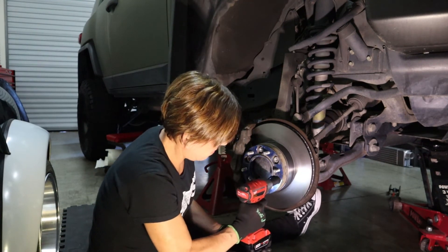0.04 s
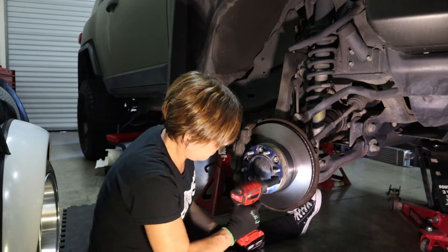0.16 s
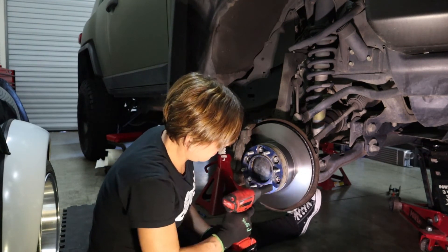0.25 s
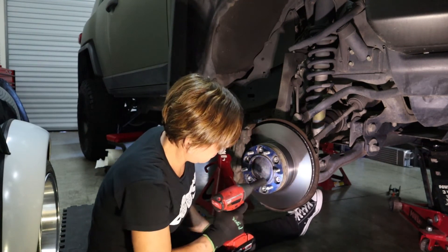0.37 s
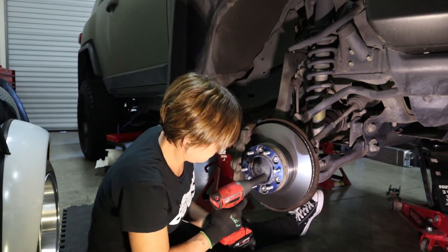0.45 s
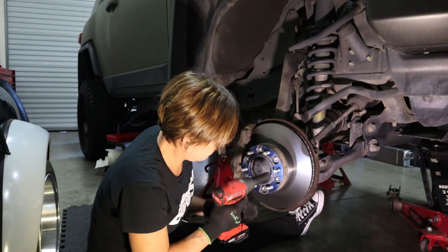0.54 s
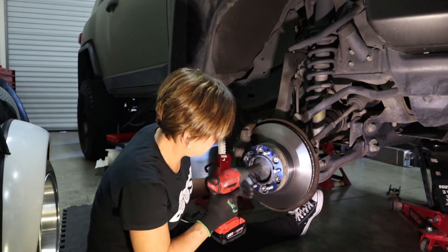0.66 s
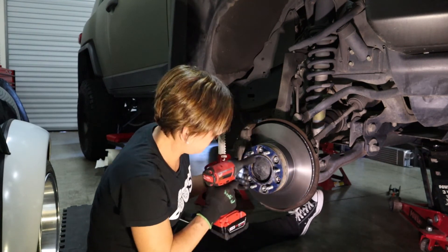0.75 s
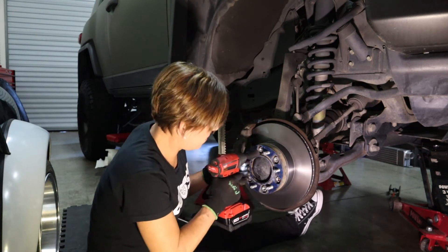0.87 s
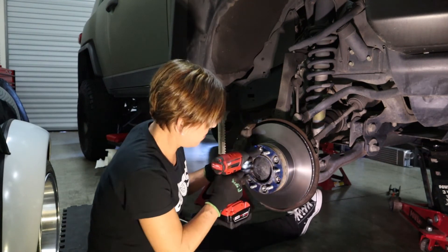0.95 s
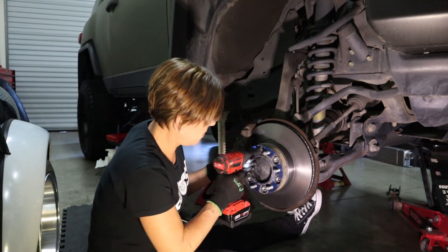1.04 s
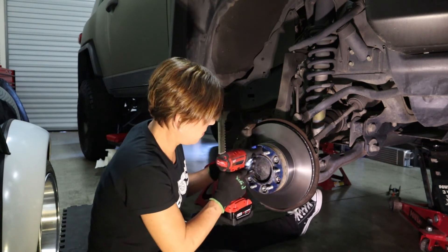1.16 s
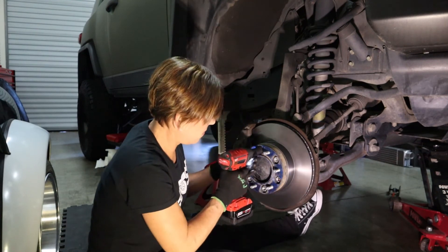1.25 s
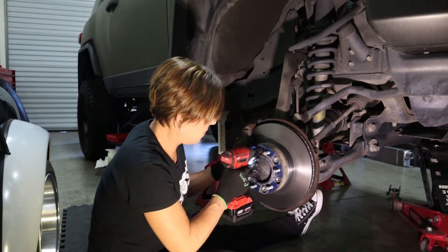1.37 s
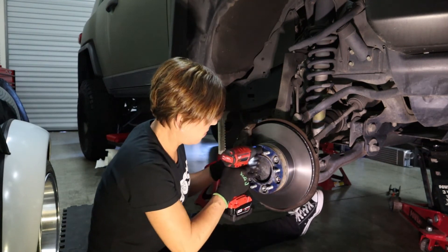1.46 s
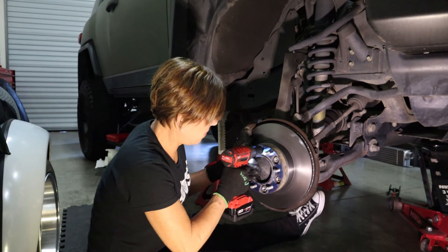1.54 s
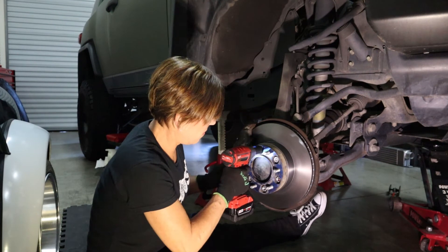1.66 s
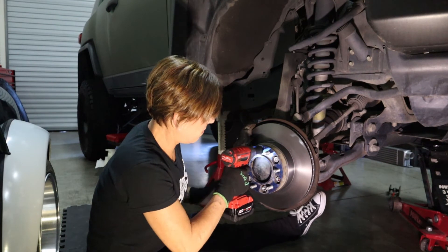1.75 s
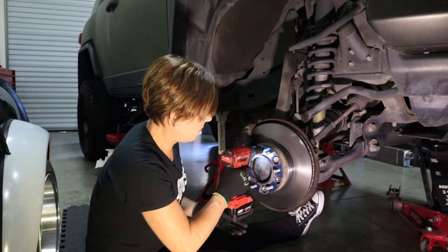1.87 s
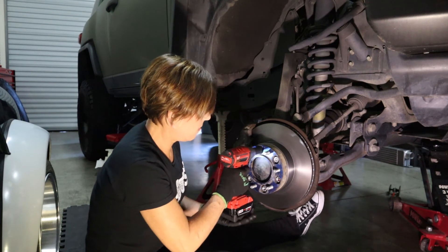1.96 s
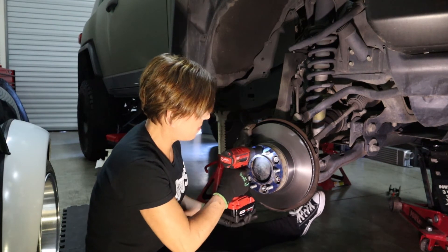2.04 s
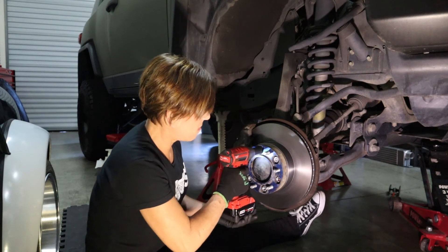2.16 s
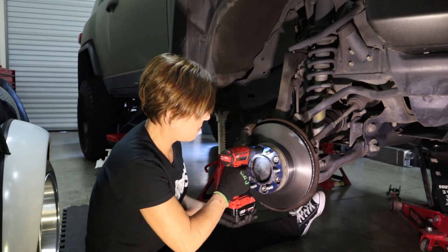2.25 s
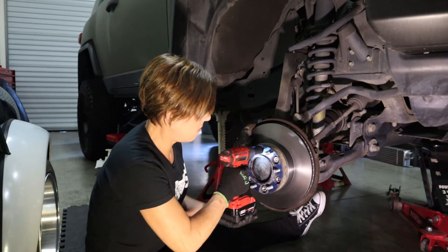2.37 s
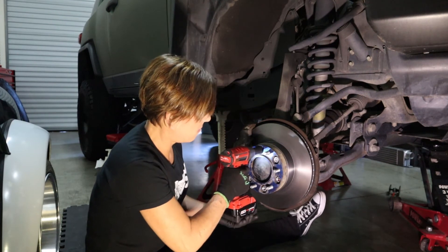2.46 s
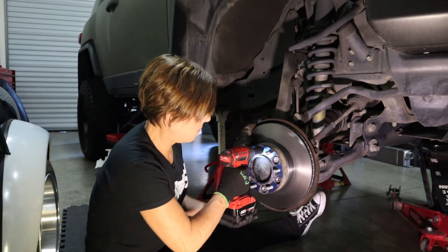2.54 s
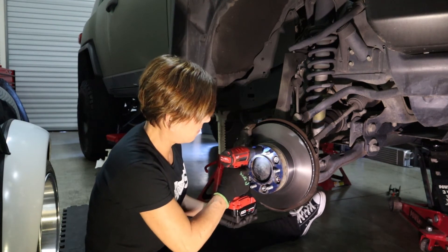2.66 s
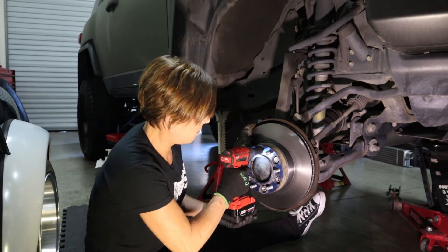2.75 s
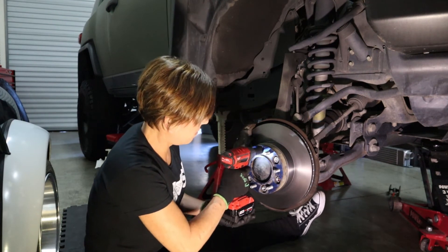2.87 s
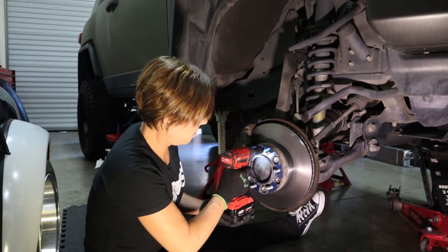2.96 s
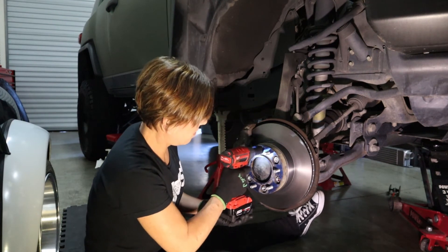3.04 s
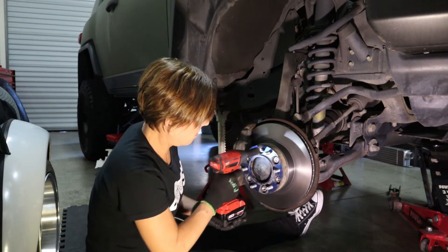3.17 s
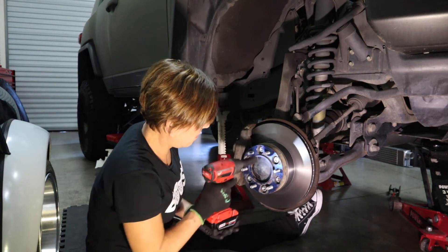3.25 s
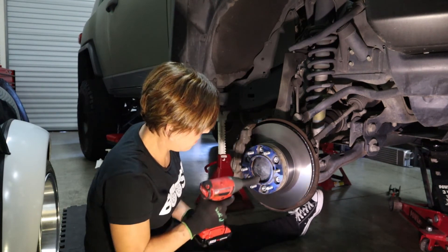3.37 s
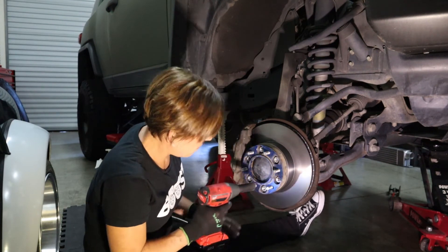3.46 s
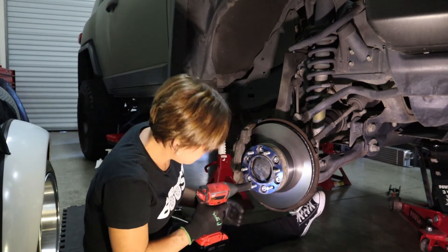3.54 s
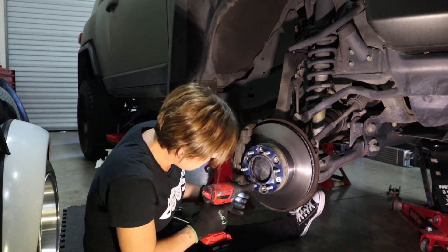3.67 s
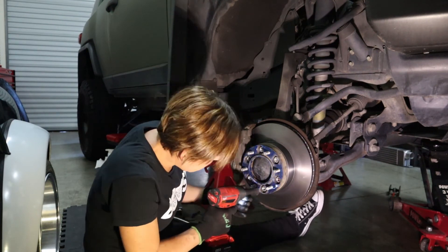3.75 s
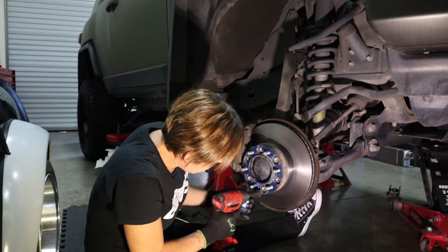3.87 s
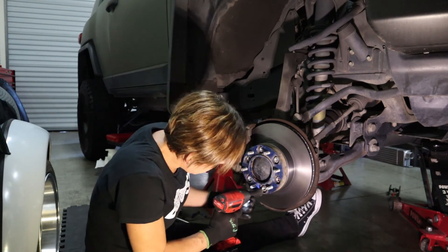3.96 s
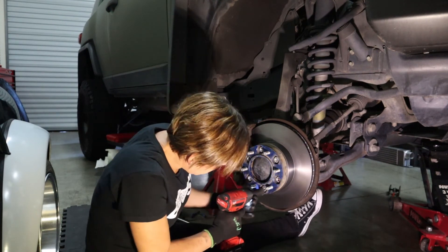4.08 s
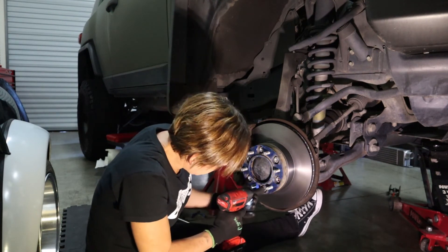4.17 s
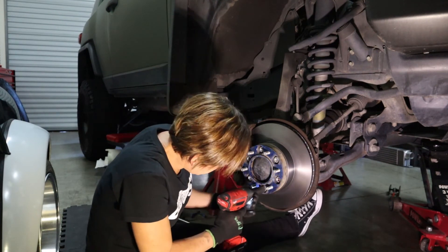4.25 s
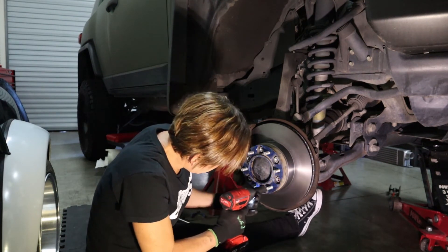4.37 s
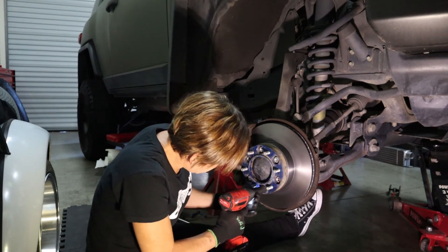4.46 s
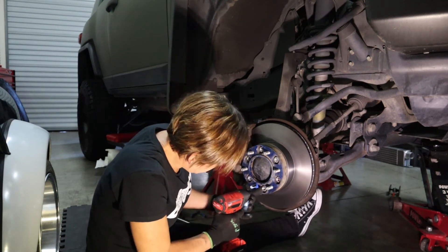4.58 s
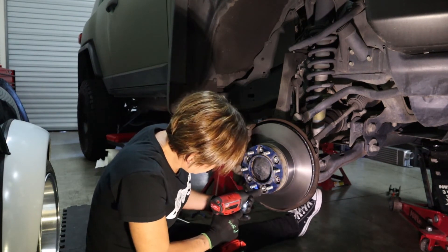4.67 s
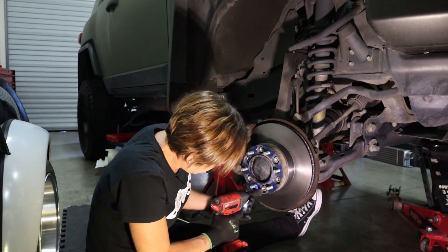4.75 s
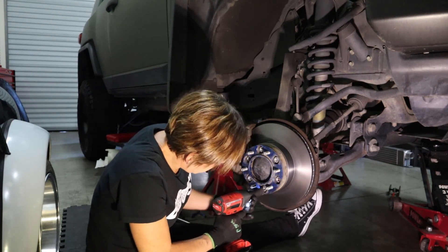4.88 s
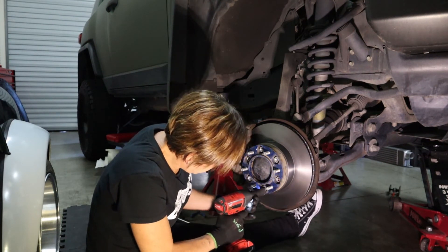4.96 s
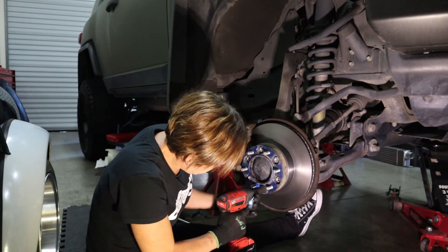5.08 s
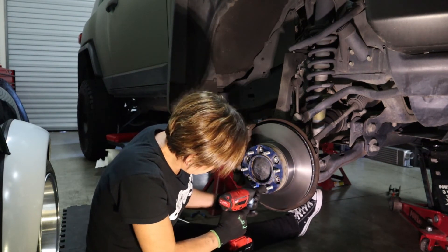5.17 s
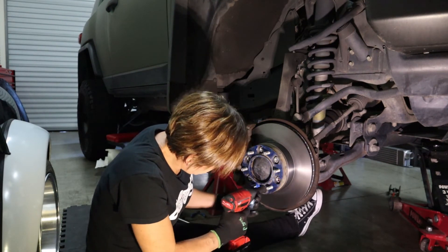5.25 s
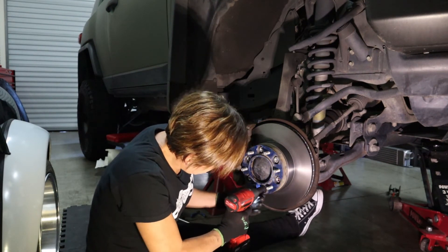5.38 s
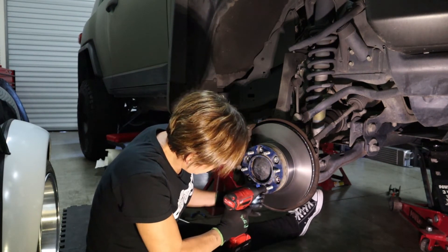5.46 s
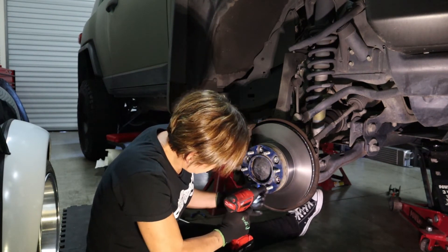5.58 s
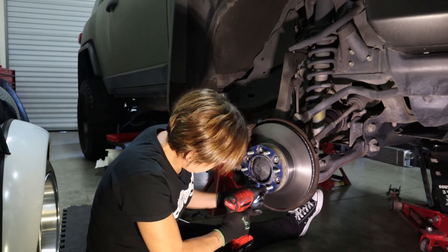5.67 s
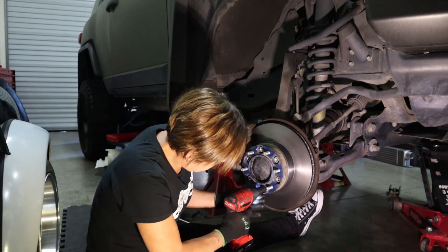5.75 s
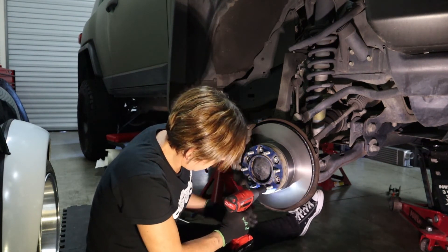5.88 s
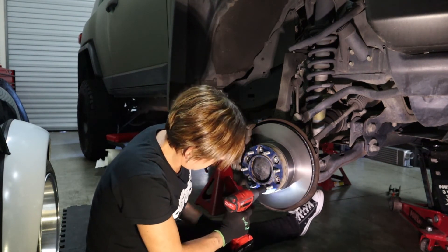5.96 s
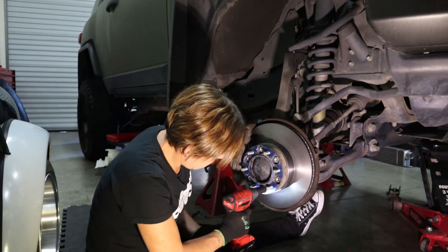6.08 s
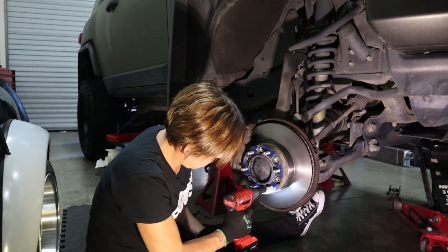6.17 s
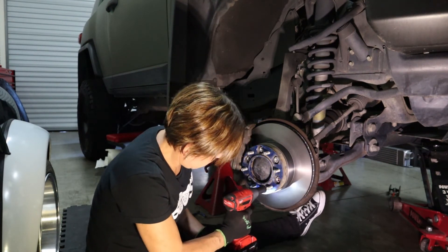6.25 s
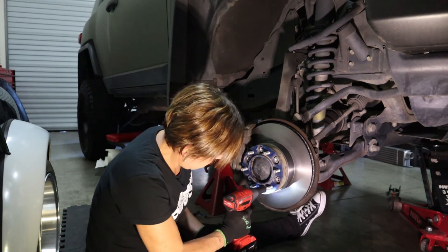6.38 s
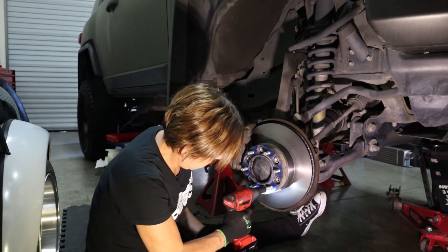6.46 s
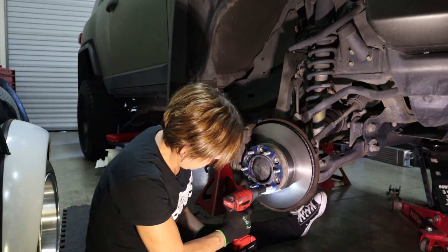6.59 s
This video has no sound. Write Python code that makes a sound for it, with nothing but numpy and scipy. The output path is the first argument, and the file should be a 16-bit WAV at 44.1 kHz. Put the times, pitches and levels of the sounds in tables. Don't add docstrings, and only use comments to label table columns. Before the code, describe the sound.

A garage with low rumble, faint mains hum and hiss, heard by a close small stereo microphone. At 0.2-0.4 s a socket ticks and lightly scrapes on a steel wheel hub with a thin high ring; duller knocks come at 1.1 and 1.2 s, then a loud bright clang on the hub cap at 1.5 s, ringing on over a scrape. After small ticks near 2.05 s, a cordless impact wrench spins up at 2.1 s with a brief thin whistle, rattles unevenly, then hammers about fifty-four blows a second until 2.9 s, thumping the microphone. Metal rings out and the room drops very quiet, slowly swelling back. Tiny dry snaps come at 3.5-3.8 s, faint clinks at 4.2-4.6 s, a knock at 5.05 s, taps, and a sharp clack at 5.45 s. From 6.1 s a second burst, loose then steady, hammers to about 6.6 s, as the sound ends.

```python
import sys
import numpy as np
from scipy import signal
from scipy.fft import rfft, irfft, next_fast_len
from scipy.io import wavfile
from scipy.ndimage import uniform_filter1d

SR = 44100
rng = np.random.default_rng(int(sys.argv[2]) if len(sys.argv) > 2 else 0)


def ratio(d):
    e = np.asarray(d, float) / 20
    return 10 ** e


def inscribe(sig):
    pcm = np.round(np.clip(np.atleast_2d(sig).T, -1, 1) * 32767)
    wavfile.write(sys.argv[1], SR, pcm.astype(np.int16))


N = 291942


def evened(x):
    return x / np.sqrt(np.mean(x ** 2) + 1e-20)


def read(points, hz):
    point_hz, value = np.transpose(points)
    return np.interp(np.log(hz + 1), np.log(point_hz + 1), value)


def level(curves):
    t, out = np.arange(N) / SR, np.zeros(N)
    for curve in curves:
        curve_s, curve_db = np.transpose(curve)
        out += ratio(np.interp(t, curve_s, curve_db, -200, -200))
    return uniform_filter1d(out, size=200)


def strokes(rows):
    edge_db = -14.5
    return level([[(start_s, db + edge_db), (peak_s, db), (end_s, db + edge_db)]
                  for start_s, peak_s, end_s, db in rows])


def grit(per_s, spread_db):
    size = ratio(spread_db * np.minimum(rng.exponential(1, N), 4))
    return evened(size * (rng.random(N) < per_s / SR))


# pitch_hz, likeness (0-1)
CHANNEL_LIKENESS = [(30, 0.97), (120, 1), (400, 0.58), (1000, 0.18), (4000, 0.033)]


def noise(spectrum, alike):
    hz = np.fft.rfftfreq(N, 1 / SR)
    a, b = rfft(rng.standard_normal((2, N)))
    same = np.clip(alike * read(CHANNEL_LIKENESS, hz), 0, 1)
    pair = np.array([a, same * a + np.sqrt(1 - same ** 2) * b])
    return evened(irfft(pair * ratio(read(spectrum, hz)), N))


def colour(row, hz, top_db):
    _, peak_db, disc_db, flange_db, tick_db = row[:5]
    points = [(1200, -9.0), (1880, -8.5), (1975, disc_db), (2150, -6), (2700, -9.0), (3800, flange_db),
              (4600, flange_db - 3), (8000, tick_db), (11500, tick_db), (12750, top_db)]
    return peak_db + read(points, hz)


def rings(modes, strikes, rub, scatter_db):
    out, shake = np.zeros((2, N)), rng.standard_normal((2, N)) + 0j
    for hz, db, t60_s in modes:
        drive = rub * (hz < 5500) * np.roll(shake, rng.integers(N), 1)
        quarter = np.array([1, rng.choice([1j, -1j])])
        for row, top_db in strikes:
            luck = rng.standard_normal(2)
            kick = ratio(colour(row, hz, top_db) + scatter_db * luck[0]) * np.exp(2j * luck[1])
            drive[:, round(row[0] * SR)] += kick * quarter
        for split_hz, share in ((0, 1), (min(.006 * hz, 22), .55)):
            pole = np.exp(2j * np.pi * (hz + split_hz) / SR - np.log(1000) / (t60_s * SR))
            out += share * ratio(db) * signal.lfilter([1], [1, -pole], drive).imag
    return out


def cracks(strikes, body, rise_s, t60_s, treble, alike, patchy_db, spiky=0.14):
    size = 4096
    out, t, hz = np.zeros((2, N + size)), np.arange(size) / SR, np.fft.rfftfreq(size, 1 / SR)
    fade = ratio(-60 * t / t60_s) * np.minimum(t / rise_s, 1)
    treble_fade = ratio(3.0 - treble * 60 * t / t60_s)
    low = 1 / (1 + (hz / 5500) ** 4)
    for row, _ in strikes:
        lumps = evened(uniform_filter1d(rng.standard_normal(len(hz)), size=50))
        a, b = rng.standard_normal((2, size))
        a, b = evened(a * abs(a) ** spiky), evened(b * abs(a) ** spiky)
        pair = np.array([a, alike * a + np.sqrt(abs(1 - alike ** 2)) * b])
        z = rfft(pair) * ratio(read(body, hz) + patchy_db * lumps + colour(row, hz, row[4]))
        burst = irfft(z * low, size) + irfft(z * (1 - low), size) * treble_fade
        at = round(row[0] * SR)
        out[:, at:at + size] += burst * fade
    return out[:, :N]


# start_s, peak_db, disc_db, tick_db (last two re peak)
FIRST_BLOWS = [(2.1383, -12.5, -22.5, -3.5), (2.1678, 2, -13.5, -3), (2.1872, -2.5, -10, -11.5),
               (2.192, 1, -9, -3.5), (2.2018, 2.5, -7, -7.5), (2.2275, -0.04, -2.5, -2),
               (2.254, -5, -10.5, 2.5), (6.1234, -23, -12.5, -6.5), (6.155, -5.5, -9, -9),
               (6.1637, 2, -14.5, -12.5), (6.189, -6.5, -1.5, -3.5), (6.1961, 4, -14, -10.5),
               (6.2217, 0.5, -14, -1.5), (6.254, -2, -9.5, -6.5), (6.262, -4.5, -8, -9),
               (6.3388, 4.5, -8.5, -7.5), (6.3835, 3, -14, -8), (6.388, -5, -15.5, -4)]


def first_blows():
    return [((s, db, disc_db, -11, tick_db - 10.0), -45) for s, db, disc_db, tick_db in FIRST_BLOWS]


# start_s, peak_db, disc_db (re peak)
SEATED = [
    [(2.2815, -3.5, -16), (2.3013, -3.5, -15.5), (2.3198, -4.5, -17), (2.3377, -7.5, -17),
     (2.3557, -9, -16), (2.3746, -8.5, -16.5), (2.3931, -4.5, -17), (2.4116, -10.5, -14),
     (2.4295, -10.5, -18), (2.4495, -8, -17.5), (2.4684, -9, -15), (2.4864, -7, -17), (2.5044, -8.5, -17),
     (2.5243, -10.5, -15.5), (2.5418, -8.5, -15.5), (2.5602, -12, -21), (2.5782, -5.5, -17.5),
     (2.5981, -9, -18), (2.6156, -11.5, -17), (2.6361, -9.5, -17), (2.653, -7.5, -16), (2.6725, -11.5, -16),
     (2.6909, -10.5, -16.5), (2.7104, -10.5, -17), (2.7293, -16.5, -19.5), (2.7473, -12.5, -19.5),
     (2.7653, -9.5, -17), (2.7852, -12.5, -17), (2.8032, -11.5, -19), (2.8236, -10, -23.5),
     (2.8421, -11.5, -17.5), (2.863, -12.5, -15.5)],
    [(6.4053, 0, -16), (6.4234, -3.5, -17), (6.4418, -3, -15), (6.4602, -3.5, -16), (6.4784, -10, -15),
     (6.4976, -6.5, -16.5), (6.5156, -8, -17.5), (6.534, -7.5, -31), (6.5525, -9.5, -15),
     (6.572, -10.5, -21.5), (6.5904, -8, -17), (6.6084, -11, -17)],
]


def seated_blows():
    return [((s, db, disc_db, -11, -11.5), -45) for run in SEATED for s, db, disc_db in run]


def tightening(blows):
    slack_db, tighten_s = -9, .2
    out = []
    for (s, db, *rest), top_db in blows:
        slack = sum(np.exp((run[0][0] - s) / tighten_s) * (s >= run[0][0]) for run in SEATED)
        out.append(((s, db + slack_db * slack, *rest), top_db))
    return out


# pitch_hz, level_db
BLOW_BODY = [(200, -29), (700, -7), (2000, -2.5), (4000, 6.5), (8000, 0), (12000, 2), (15000, -13.5)]


def blow_contact(first, seated):
    loose = cracks(first, BLOW_BODY, 0.0006, 0.03, 0.09, 0.02, 1.5, spiky=.35)
    firm = cracks(seated, BLOW_BODY, 0.0005, 0.032, .07, 0.02, 2.5, spiky=.45)
    return ratio(7.5) * loose + ratio(5.0) * firm


# pitch_hz, level_db, t60_s
ANVIL = [(3940, 2, .02), (5180, -8, .018), (10200, -9, .03), (4600, -8, .03), (8600, -12, .025),
         (11800, -11, .025)]


def anvil_ring(tight):
    return ratio(5) * rings(ANVIL, tight, 0, 2.1)


# pitch_hz, level_db, t60_s
STUDS = [(3820, -10, .3), (3877, -4, .4), (3983, -5, .4), (9886, -8, .1)]


def stud_ring(tight):
    return ratio(-18.5) * rings(STUDS, tight, 0, 1.5)


# pitch_hz, level_db, t60_s
HUB = [(680, -21, .3), (884, -27, .35), (988, -20, 0.32), (1338, -19, .25), (1436, -13, 0.17),
       (1646, -17.5, 0.32), (1862, -14, 0.32), (1976, 0.5, 0.28), (2185, -17, .3), (2320, -13, 0.26),
       (2500, -15, 0.3), (2957, -15.5, 0.19), (3230, -16.5, 0.2)]
# pitch_hz, level_db, t60_s
FLANGE = [(3542, -14, .24), (3718, -16, .3), (3860, -15, .35), (4200, -12, .22), (4560, -13, .16),
          (4877, -17, .16), (5220, -18, .13), (6680, -19, .1)]


def hub_ring(knocks, blows, rub):
    knocked = rings(HUB + FLANGE, knocks, rub, 2.5)
    hammered = rings(HUB + FLANGE, blows, 0, 1.6)
    return ratio(-3.5) * knocked + ratio(-14.0) * hammered


# press_s, release_s, whir_db (full speed)
TRIGGER = [
    (2.126, 2.879, -25.5),
    (6.116, 6.697, -26.5),
]


def motor():
    spin_up_s, spin_up_db, sag_db_per_s, stop_s = .045, -22, 3, 0.033
    return level([[(a, db + spin_up_db), (a + spin_up_s, db), (b, db - sag_db_per_s * (b - a)),
                   (b + stop_s, db + spin_up_db)] for a, b, db in TRIGGER])


# pitch_hz, level_db (per Hz)
WHIR = [(180, -30.5), (300, -13), (536, -7.5), (1760, -13), (1950, -5.5), (2950, -19), (3910, -1),
        (6860, -12), (11800, -10.5), (13500, -15), (15700, -41.5)]


def motor_whir():
    return ratio(-2.0) * motor() * noise(WHIR, 0.1)


# peak_db, rise_hz
WHISTLE = [
    (-27.5, 500),
    (-38.5, 29),
]


def whistle():
    pitch_hz, peak_s, length_s = 9800, 0.045, 0.036
    t = np.arange(N) / SR
    rows = [(a, a + peak_s, a + length_s, db) for (a, *_), (db, _) in zip(TRIGGER, WHISTLE)]
    rise = sum(hz * np.exp(-((t - row[1]) / 0.017) ** 2) for row, (_, hz) in zip(rows, WHISTLE))
    pitch = pitch_hz + rise + 900 * uniform_filter1d(rng.standard_normal(N), size=60)
    return np.sqrt(2) * strokes(rows) * np.sin(2 * np.pi * np.cumsum(pitch) / SR)


# start_s, peak_s, end_s, level_db
SLIDES = [(.22, .28, 0.33, -40.5), (.3, .36, 0.34, -68), (.98, 1.07, 1, -59), (1.3, 1.44, 1.86, -47.5),
          (2.0, 2.06, 0.84, -54), (2.08, 2.128, 1.8, -58.5), (4.36, 4.48, 4.66, -61.5),
          (5.21, 5.225, 5.4, -53.5), (5.36, 5.45, 4.96, -52.5)]
# start_s, peak_s, end_s, level_db
RATTLES = [(2.15, 2.19, 2.2, -10), (2.19, 2.25, 2.306, -15), (6.145, 6.17, 6.2, -21),
           (6.29, 6.325, 6.12, -10)]


def hub_rub():
    sliding = strokes(SLIDES) * grit(1500, 1.3)
    return ratio(-28.5) * (sliding + motor() * ratio(-6) + strokes(RATTLES))


# start_s, peak_db, disc_db, flange_db, tick_db (last three re peak)
KNOCKS = [(0.244, -33, -12, -3.5, -31), (0.257, -33, -34.5, -4, -21), (0.271, -37, -2, -14, -11.5),
          (1.109, -22, -21, -22.5, -40), (1.234, -20, -15.5, -10, -36), (1.346, -27, -27, -9, -32),
          (4.178, -46.5, -10.5, -19, -16.5), (4.398, -48, -17, -35, -40), (4.409, -55, -4, -20, -26.5),
          (4.47, -37.5, -13, -15, -35.5), (4.558, -46.5, -16, -6, -40), (4.618, -52.5, -19.5, -20.5, -33.5),
          (5.055, -25, -4, -12, -14), (5.228, -37, -17, -1.5, -28), (5.275, -39, -5, -35, -25),
          (5.362, -49.5, -14, -20, -36), (5.4, -47, -21, -6, -24), (5.418, -36, -24, -6.5, -13),
          (5.452, -15.5, -7.5, 1, -7)]


def socket_knocks():
    return [(row, -70) for row in KNOCKS]


# start_s, peak_db, tick_db (re peak)
TICKS = [(0.202, -47, -29), (0.216, -42, 0), (.224, -35.5, -7.5), (0.366, -40.5, -10.5),
         (0.379, -35.5, -15), (0.387, -41, -11), (.484, -53, -21.5), (.557, -54, -5.5), (2.033, -47.5, -19),
         (2.047, -41.5, -14.5), (2.059, -41, -10.5), (2.072, -47, -20.5), (2.092, -39, -4.5),
         (6.064, -54.5, -5)]


def light_ticks():
    return [((s, db, -27, -6.5, tick_db), -70) for s, db, tick_db in TICKS]


# pitch_hz, level_db
KNOCK_BODY = [(300, -15), (700, 2), (2000, 9), (4000, 6), (8000, 0.5), (13000, -7), (16000, -15)]


def knock_contact(knocks, ticks):
    clack = ratio(2.5) * cracks(knocks, KNOCK_BODY, 0.0016, 0.12, 2.5, 0.16, 1.5)
    return clack + ratio(8.5) * cracks(ticks, KNOCK_BODY, 0.00064, 0.014, .8, 0.17, 3.0)


# start_s, peak_db, disc_db, flange_db, tick_db, top_db (last four re peak)
CAP_KNOCK = [(1.483, -6.5, 0.00037, 0.0037, -23, -20)]


def cap_contact():
    strikes = [(row, row[5]) for row in CAP_KNOCK]
    return ratio(4.5) * cracks(strikes, KNOCK_BODY, 0.0015, 0.05, .4, .2, 1.2)


# pitch_hz, level_db, t60_s
CAP = [(988, -8, .75), (1712, 3, .25), (1780, 2.5, .06), (1974, 7.5, .36), (2098, 1.5, .16),
       (2194, 1.5, .35), (2729, -.5, .12), (2964, -7, .22), (3068, 3.5, .55), (3128, -.6, .15),
       (3640, -8, .4), (4157, 1.5, .5), (4203, 5, .07), (5187, -.5, .4), (6218, -3, .28), (9356, 1, .2)]


def cap_ring():
    return ratio(-17.5) * rings(CAP, [(row, row[5]) for row in CAP_KNOCK], 0, 0)


# start_s, level_db
SOCKET_TAPS = [(0.223, -44), (0.245, -36), (.271, -54), (0.387, -53.5), (1.108, -49.5), (1.234, -37.5),
               (5.06, -61), (5.419, -66)]
# pitch_hz, level_db, t60_s
SOCKET = [(12750, -8.5, .42)]


def socket_ring():
    return rings(SOCKET, [((s, db, 0, 0, 0), 0) for s, db in SOCKET_TAPS], 0, 0)


# start_s, pitch_hz, level_db, t60_s
NOTES = [(.266, 1978, -47.5, 0.46), (1.344, 870, -34, 0.03), (1.347, 3490, -41.5, 0.15),
         (1.49, 593, -34, 0.24), (2.167, 1087, -17, 0.062), (2.168, 780, -22.5, .09),
         (2.85, 681.6, -40, 0.3), (2.862, 985, -53.5, .85), (2.87, 922, -46, 0.51), (2.89, 1978, -51, 0.61),
         (.285, 1978, -43, 0.48), (.281, 4280, -44, 0.1), (4.19, 1975, -60, .3), (4.57, 1973, -56.5, .25),
         (6.39, 1975, -31, 0.25), (2.184, 1985, -22, 0.2), (2.216, 1978, -20.5, 0.4),
         (2.266, 1976, -18, 0.25), (2.195, 1316, -7.5, 0.021), (3.763, 699, -59, 0.024),
         (4.181, 880, -69, 0.23), (4.183, 2480, -64, 0.4), (4.399, 4190, -69, .2), (4.47, 190, -56, 0.22),
         (4.56, 3600, -63.5, 0.35), (4.63, 12750, -64, 0.3), (5.055, 2420, -45.5, 0.44),
         (5.056, 299.4, -46, 0.36), (5.057, 189, -45.5, 0.42), (5.058, 1420, -50.5, 0.54),
         (5.061, 480, -55.5, 0.43), (5.229, 4220, -39.5, 0.14), (5.23, 4170, -46.5, 0.32),
         (2.33, 686, -38.5, .7), (2.58, 688, -38, .6), (5.452, 1972, -44, 0.63),
         (5.455, 235.4, -38.5, 0.41), (5.457, 417, -42.5, 0.33), (5.457, 1437, -42, 0.43),
         (6.152, 1100, -24, 0.1), (6.31, 112, -22, 0.16), (6.315, 1962, -22.5, 0.74),
         (6.35, 1975, -25, 0.42), (6.17, 2040, -30, .35), (2.88, 1969, -40.5, 0.35),
         (5.231, 2450, -65, 0.22)]


def notes():
    out, t = np.zeros((2, N + SR)), np.arange(SR) / SR
    ear_t = t + np.array([[0], [.00005]])
    for s, hz, db, t60_s in NOTES:
        spread = .22 if hz < 600 else .004
        group = hz * (1 + spread * np.array([0, -1, 1]) * rng.uniform(0.41, 1, 3))
        ring = sum(share * np.sin(2 * np.pi * f * ear_t) for f, share in zip(group, (.9, .3, .3)))
        at = round(s * SR)
        out[:, at:at + SR] += ratio(db - 60 * t / t60_s) * np.minimum(t * hz / 3, 1) * ring
    return out[:, :N]


# start_s, centre_hz, width_hz, level_db, t60_s
CLUSTERS = [(0.244, 2240, 660, -35, 0.35), (.256, 4290, 90, -44, .3), (4.181, 476, 400, -52.5, .12),
            (1.109, 2000, 1500, -34, 0.13), (1.234, 2240, 900, -33, 0.4), (1.237, 3064, 199, -32.5, .25),
            (1.236, 4460, 500, -35, .2), (1.11, 650, 200, -41, 0.13), (5.056, 645, 200, -49, 0.13),
            (1.238, 5300, 150, -40, .15), (1.483, 3063, 140, -24, 0.36), (1.484, 3690, 160, -33.5, 0.44),
            (1.487, 1763, 175, -26, 0.2), (1.486, 2066, 303, -19, 0.28), (1.488, 4190, 110, -30.5, 0.32),
            (1.487, 4750, 150, -39, .4), (1.488, 6300, 1500, -33, .3), (2.86, 3950, 250, -37.5, 0.61),
            (2.861, 910, 50, -38, 0.39), (4.178, 1433, 89.7, -62, 0.38), (4.178, 3816, 299.6, -55.5, 0.053),
            (4.4, 2450, 150.6, -63, 0.14), (4.471, 4470, 806, -49, 0.14), (4.473, 900, 493, -56, 0.28),
            (5.453, 3730, 450, -26, 0.55), (5.454, 3250, 201, -33, 0.3), (5.4525, 3600, 900, -14, .03),
            (5.454, 2350, 301, -30, 0.12), (5.454, 146.3, 89.5, -33, 0.27), (4.18, 220, 150, -62, 0.37),
            (6.338, 4794, 700, -17, 0.18), (6.383, 4300, 900, -9, .06)]


def clusters():
    out = np.zeros((2, N + SR))
    for s, hz, width_hz, db, t60_s in CLUSTERS:
        t, luck = np.arange(round(min(1.3 * t60_s, 1) * SR)) / SR, rng.random((9, 3))
        group = hz + width_hz * ((np.arange(9) + luck[:, 0]) / 9 - .5)
        ring = sum(np.sin(2 * np.pi * (f * t + turn[1:, None])) for f, turn in zip(group, luck)) / 3
        at = round(s * SR)
        out[:, at:at + len(t)] += ratio(db - 60 * t / t60_s) * np.minimum(t * hz / 3, 1) * ring
    return out[:, :N]


def slide_noise():
    spectrum = [(400, -24.5), (1000, 6.0), (2500, -6.5), (5000, -2.5), (8000, -35.5)]
    return ratio(-9.5) * strokes(SLIDES) * noise(spectrum, 1.0)


# start_s, peak_s, end_s, level_db
BRUSHES = [(.195, .22, 0.63, -67), (.3, .39, 0.6, -71), (.98, 1.07, 1.11, -63), (2.01, 2.06, 2.2, -64)]


def brush_noise():
    spectrum = [(2000, -18.5), (6000, 0.5), (11000, -3.5), (14000, -13.5)]
    grain = .6 + 1.5 * uniform_filter1d(grit(400, 4.0), size=30)
    return strokes(BRUSHES) * grain * noise(spectrum, 0.87)


# start_s, peak_db, tick_db (re peak)
SNAPS = [(3.48, -68.5, -20), (3.743, -64, -10), (3.7608, -50.5, -16)]


def snap_contact():
    strikes = [((s, db, -8, -8, tick_db), -70) for s, db, tick_db in SNAPS]
    return ratio(7.0) * cracks(strikes, KNOCK_BODY, 0.00026, .018, .6, 0.42, 2.4)


# start_s, thump_db
OVERLOADS = [(2.254, -12.5), (2.3211, -11.5), (2.3547, -27.5), (2.3727, -19), (2.3932, -21.5),
             (2.4122, -16), (2.4285, -28), (2.5244, -18.5), (2.5974, -18), (2.6362, -25), (2.6533, -13),
             (2.6733, -14.5), (2.691, -23.5), (2.7116, -12.5), (2.7295, -22.5), (2.7472, -13.5),
             (2.7668, -16.5), (2.7861, -26), (2.8031, -22), (2.8242, -16.5), (2.8417, -17), (6.4231, -28.5),
             (6.4413, -28), (6.46, -17.5), (6.479, -17), (6.5151, -16.5), (6.5349, -25.5), (6.554, -12.5),
             (6.5735, -21)]


def thumps(blows):
    size = 512
    out, ms = np.zeros((2, N + size)), np.arange(size) / SR * 1000
    faint = [(row[0], row[1] - 37.5) for row, _ in blows]
    for s, db in OVERLOADS + faint:
        luck = rng.random(5)
        start = 1.1 + 0.35 * luck[0] - np.array([[0], [0.57 + .5 * luck[1]]])
        spike = np.array([[.9], [.5 * luck[2]]]) * np.exp(-((ms - start) / 0.17) ** 2)
        width = np.array([[0.38 + 0.5 * luck[3]], [0.33 + 0.37 * luck[4]]])
        dip = np.exp(-((ms - start - .3 - width) / width) ** 2)
        rebound_at = start[0] + width[0] + np.array([[.25], [-.3]])
        rebound = np.array([[1.2], [.6]]) * luck[2] * np.exp(-((ms - rebound_at) / .2) ** 2)
        at = round(s * SR)
        out[:, at:at + size] += ratio(db + np.array([[13], [10.5]])) * (spike - dip + rebound)
    for cut_hz in (75, 45):
        out = signal.lfilter(*signal.butter(1, cut_hz, "high", fs=SR), out)
    return out[:, :N]


# pitch_hz, likeness (0-1)
PORT_SAME = [(200, 1.28), (900, 0.29), (1900, 0.43), (3800, 0.36), (7500, 0.04), (13000, 0.5)]
# pitch_hz, lead_rad
PORT_TURN = [(300, 0.14), (900, -0.6), (1900, 1.4), (3800, 1.5), (7500, 2.5), (13000, 2.1)]
# pitch_hz, level_db
PORT_DB = [(300, -0.26), (900, -1), (1900, -1), (3800, -0.76), (7500, 0.54), (13000, 2.5)]


def ports(x):
    size = next_fast_len(N)
    hz, (a, b) = np.fft.rfftfreq(size, 1 / SR), rfft(x, size)
    same, tilt = np.clip(read(PORT_SAME, hz), 0, 1), ratio(read(PORT_DB, hz) / 2)
    right = same * np.exp(1j * read(PORT_TURN, hz)) * a + np.sqrt(1 - same ** 2) * b
    return irfft(np.array([a * tilt, right / tilt]), size)[:, :N]


# pitch_hz, t60_s
GARAGE = [(200, 0.92), (1000, 0.45), (2000, 0.68), (4000, 0.72), (8000, 0.48), (14000, 0.36)]


def garage(x):
    taps = np.zeros((2, SR))
    at = np.arange(260, SR - 20, 20) + rng.integers(0, 20, (2, (SR - 261) // 20))
    np.put_along_axis(taps, at, rng.choice([-1., 1.], at.shape), 1)
    hz, t, z = signal.stft(taps, SR, nperseg=256)
    t60_s = read(GARAGE, hz)[:, None]
    decay = ratio(-60 * t / (0.18 * t60_s)) + ratio(-5 - 60 * t / t60_s)
    tail = signal.istft(z * decay, SR, nperseg=256)[1]
    return signal.fftconvolve(x, tail / np.linalg.norm(tail[0]), axes=1)[:, :N]


def waver():
    return 1 + 0.42 * evened(signal.lfilter([1], [1, -.9996], rng.standard_normal(N)))


# start_s, rumble_db
GAIN_CONTROL = [(0, -55), (.8, -53.5), (1.5, -48), (2.1, -49), (2.9, -68.5), (3.3, -74.5), (3.7, -74),
                (4.2, -70), (4.8, -66.5), (5.6, -58.5), (6.1, -61.5), (6.62, -40)]
# pitch_hz, level_db (per Hz)
RUMBLE = [(12, -38), (20, -1), (48, -9.5), (81, -3), (114, -1), (149, -8), (226, -10.5), (309, -13),
          (568, -22.5), (640, -18), (700, -28.5), (910, -56), (1540, -120)]
# pitch_hz, level_db (per Hz)
HISS = [(300, -32), (600, -4), (3200, -14.5), (7000, -25), (11800, -26.5), (13200, -58.5)]
# pitch_hz, level_db (re rumble)
MAINS = [(120, -3), (221, -13), (54.7, -5.5)]
# start_s, level_db
HUMS = [
    (0, -55.5),
    (2.88, -59),
]


def room_tone():
    t = np.arange(N) / SR
    mains = sum(ratio(db) * waver() * np.sin(2 * np.pi * hz * t) for hz, db in MAINS)
    far = np.sin(2 * np.pi * 107.7 * t) + .15 * np.sin(np.pi * 107.7 * t)
    fade_db_per_s = 14.5
    hum = sum(ratio(db - fade_db_per_s * (t - s)) * (t >= s) for s, db in HUMS)
    air = noise(RUMBLE, 1) + mains + ratio(-9) * noise(HISS, 0.24)
    return level([GAIN_CONTROL]) * air + hum * far


def scene():
    first, seated = first_blows(), seated_blows()
    knocks, ticks = socket_knocks(), light_ticks()
    tight = tightening(seated)
    steel = hub_ring(knocks + ticks, first + seated, hub_rub()) + stud_ring(tight)
    steel += cap_ring() + anvil_ring(tight) + socket_ring() + notes() + clusters()
    clack, clang = knock_contact(knocks, ticks), cap_contact()
    contact = blow_contact(first, seated)
    moving = motor_whir() + slide_noise() + brush_noise()
    near = steel + clack + clang + contact + moving + whistle() + snap_contact()
    dull = signal.sosfilt(signal.butter(4, 6500, fs=SR, output="sos"), clack + 0.74 * clang)
    room = ratio(-6) * garage(dull + contact + moving + 0.18 * steel)
    return ports(near + room) + thumps(first + seated) + room_tone()


def top_cut(x):
    return signal.sosfilt(signal.butter(12, 15840, fs=SR, output="sos"), x)


def record(dry):
    low_pass = signal.firwin(101, 15500, fs=SR)[None]
    soft = signal.oaconvolve(np.clip(dry, -1.05, 1.05), low_pass, "same")
    return top_cut(np.clip(soft, -1, 1))


dry = scene()
out = record(dry)
inscribe(out)
```